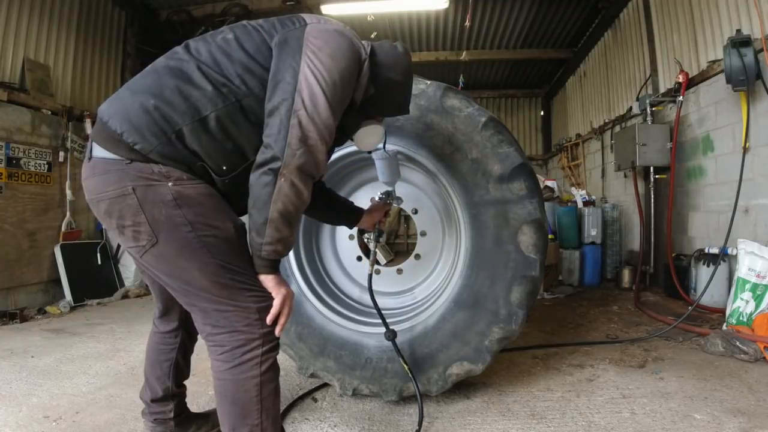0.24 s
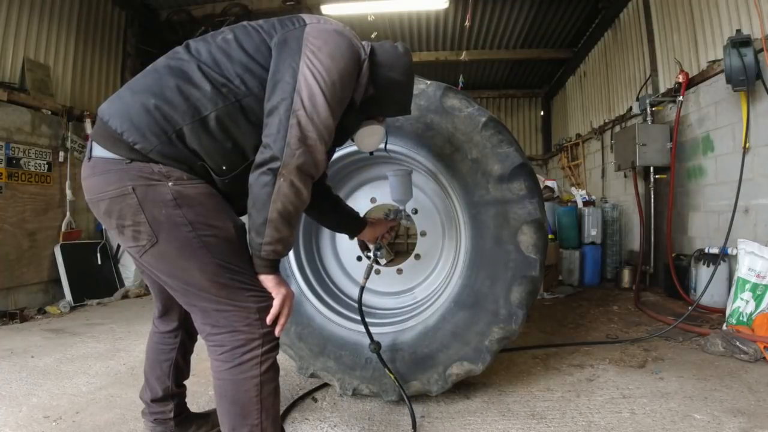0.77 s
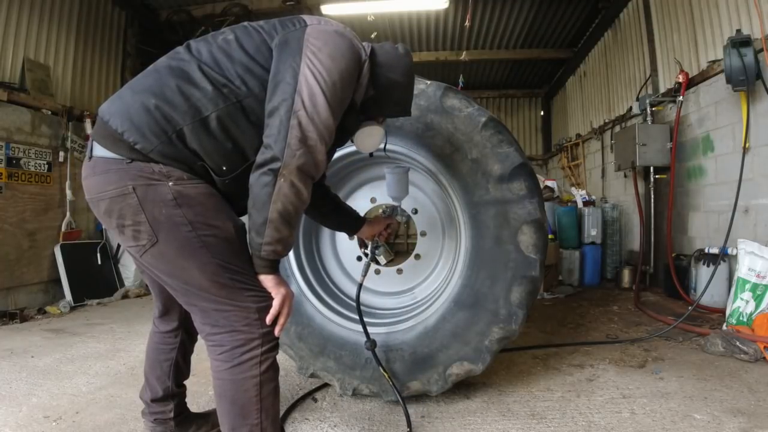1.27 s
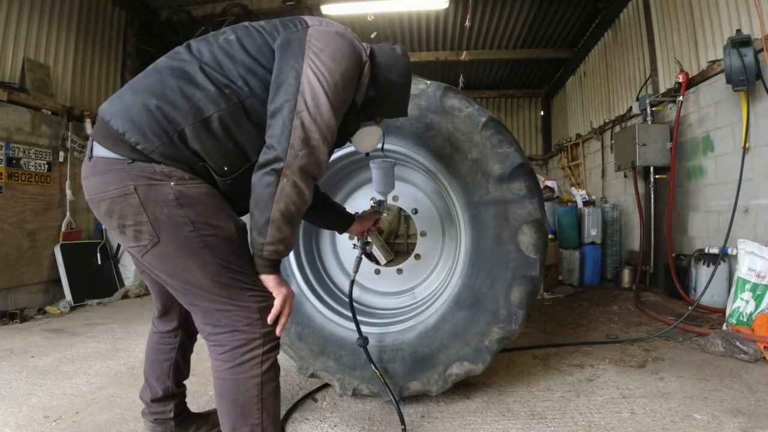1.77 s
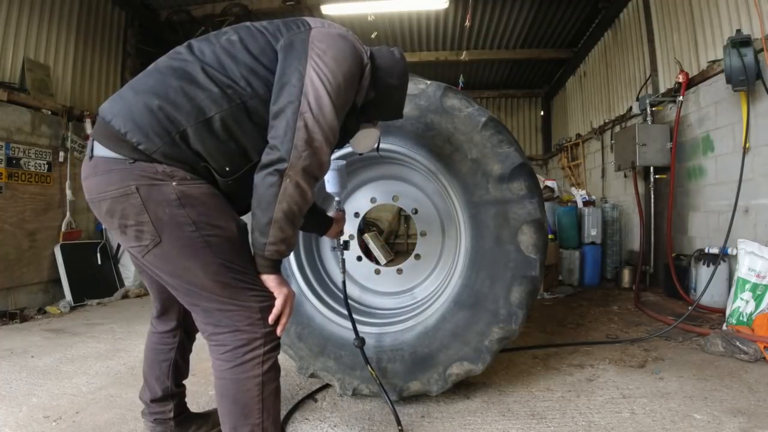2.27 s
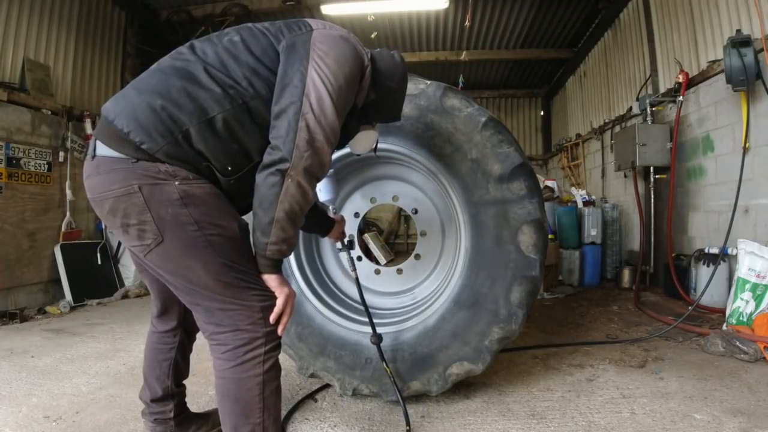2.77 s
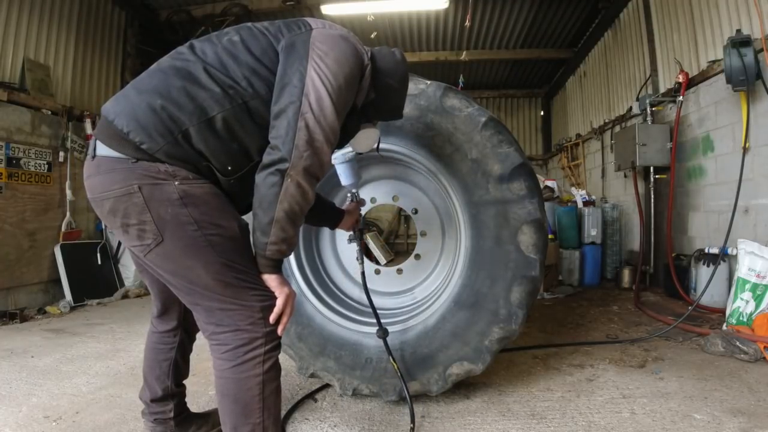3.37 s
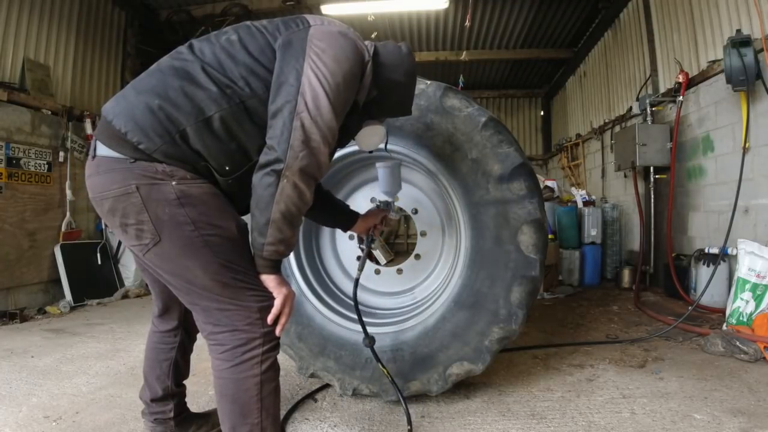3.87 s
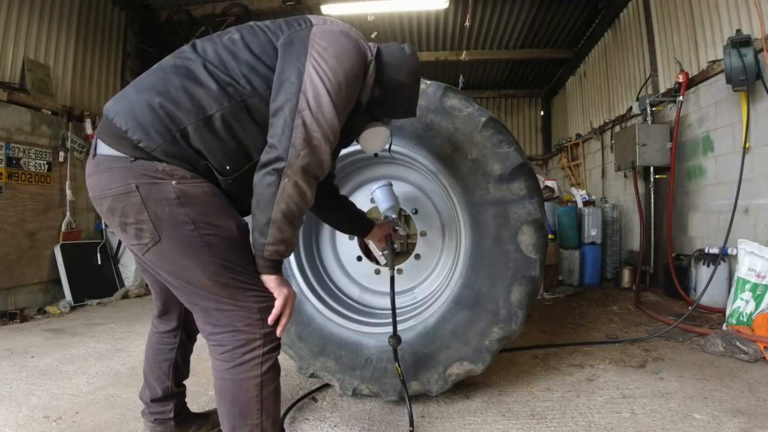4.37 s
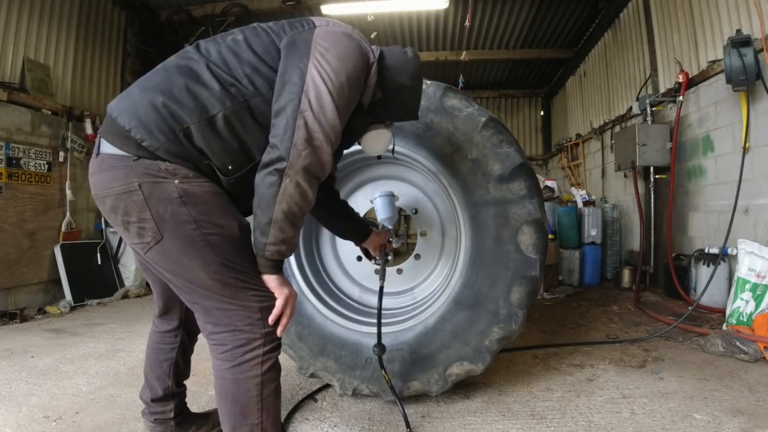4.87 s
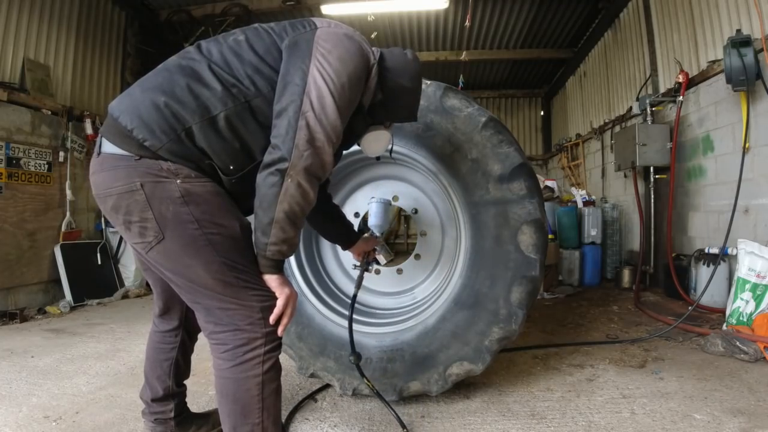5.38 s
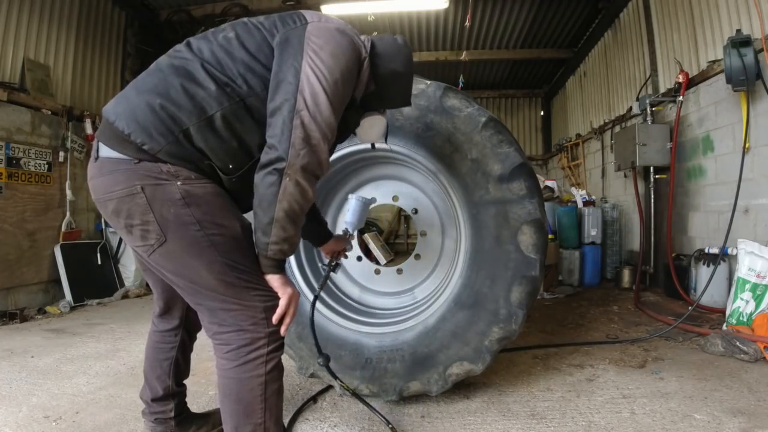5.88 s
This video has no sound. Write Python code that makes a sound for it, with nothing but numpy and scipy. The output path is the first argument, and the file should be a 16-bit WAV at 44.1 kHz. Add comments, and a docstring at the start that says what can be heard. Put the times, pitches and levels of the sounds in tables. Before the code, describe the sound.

A compressed-air spray gun paints a tractor wheel's steel rim, heard from nearby in a sheet-metal shed. Its loud, bright hiss is already going at the start and stops at about 0.6 seconds. Three longer passes follow, from 0.8 to 2.1 seconds, from 2.3 to 4 seconds, and from 4.3 to the end at about 6 seconds. Each opens with a brief, sharper rush of dry air. The hiss stays steady in level but shifts in colour as the gun moves, and thin whistling tones come and go inside it, very high at first and lower after about 2.3 seconds. Underneath, air flutters in the hollow of the rim with small low puffs, stronger from about 3 seconds, along with a faint draught. In the short breaks the shed's echo dies away quickly over a faint low hum.

```python
"""In a sheet-metal shed, a compressed-air gun sprays paint on a tractor wheel's steel rim, in four passes.
Each pull of the trigger lets out air first, then the full spray. The rushing jet hisses, changing colour
as it is turned, and brief tones ring in the gap between nozzle and steel. The air rings and flutters in
the dish of the rim and stirs up a draught. Between passes the shed's echo dies away over a low hum."""
import sys
import numpy as np
from scipy import signal
from scipy.io import wavfile

SR = 44100
rng = np.random.default_rng(int(sys.argv[2]) if len(sys.argv) > 2 else 0)


def to_wav(sig):
    """Store sig (one row per channel, or 1-D mono) as 16-bit WAV at the path in sys.argv[1].

    Samples outside -1..1 are clipped; the rate is SR.
    """
    pcm = np.clip(np.atleast_2d(sig), -1, 1) * 32767
    pcm = np.round(pcm).astype(np.int16)
    wavfile.write(sys.argv[1], SR, pcm.T)  # frames by channels


N = 270465

# trigger pulls: (air starts [s], full spray [s], let go [s], closing time [s],
# opening rush of dry air [dB], closing rush [dB])
TRIGGER_PULLS = [(-.2, -.1, 0.6, 0.057, 4.5, 3), (0.753, 0.793, 2.09, 0.051, 7, 1.5),
                 (2.292, 2.328, 3.966, 0.056, 4, 1), (4.231, 4.265, 6, 0.05, 6, 5)]
# colour of the hiss: (frequency [Hz], relative level [dB])
JET_SPECTRUM = [(250, -30.5), (450, -8.5), (850, -6.5), (1350, -6.5), (1800, -6), (2700, -5.5), (3700, 1),
                (5200, 0), (6800, -5), (8400, -3.5), (9600, -1.5), (12500, -4), (14500, -4), (16000, -7)]
# loudness of the hiss as the gun moves about the hub: (time [s], relative level [dB])
JET_LOUDNESS = [(.03, -32.5), (1.3, -32.5), (1.9, -32), (2.6, -34), (3.88, -31.5), (4.7, -31.5),
                (5.94, -30)]
# how alike the noise is at the two ears: (frequency [Hz], likeness [0 to 1])
EAR_LIKENESS = [(25, 0.97), (150, 1), (600, .96), (850, .97), (1350, 0.91), (1800, 1), (2200, 0.82),
                (3300, 0.88), (4300, 0.22), (5200, 0.51), (7000, 0.21), (8500, 0.15), (9700, 0.4),
                (11300, 0.24), (12800, 0.2), (15000, .12)]
# splash on the steel, in the middle treble: (time [s], relative level [dB])
SPLASH_SWING = [(.03, 4), (1.15, 5.5), (1.5, 9.5), (1.63, 8.5), (1.83, 9), (2, 6), (2.8, 4), (3.07, 4),
                (3.7, 7), (4.66, 7.5), (4.8, 3.5), (5.94, 3.5)]
# where the splash changes the hiss: (frequency [Hz], share of the swing [factor])
SPLASH_SHARE = [(2800, 0.11), (4000, 0.43), (5000, 1.1), (6300, 0.97), (8200, 0.89), (10000, 0.38),
                (12000, 0.44)]
# sizzle of the nozzle, in the top treble: (time [s], relative level [dB])
SIZZLE_SWING = [(0.03, 7), (0.57, 1.5), (1.06, 9), (1.42, 2), (1.96, -0.5), (2.62, 3), (4.77, 0.6),
                (5.94, 1.0)]
# where the sizzle changes the hiss: (frequency [Hz], share of the swing [factor])
SIZZLE_SHARE = [(7200, 0.034), (8500, .3), (9700, 0.69), (11000, 0.97), (12900, 0.93), (15500, 0.96)]
# air without paint is thinner and brighter: (frequency [Hz], share of the rush [factor])
DRY_AIR_SHARE = [(700, -1.64), (2000, 0.0027), (4500, -0.13), (7500, 0.95), (15000, 1)]
# whistles of the air cap at the gun's tip: (pitch [Hz], width [Hz], level over the hiss [dB])
CAP_WHISTLES = [(5260, 160, -16), (7400, 200, 3), (8650, 230, -12), (10030, 220, -5)]
# tones in the gap: (start [s], end [s], first pitch [Hz], last pitch [Hz], level over the hiss [dB])
GAP_RINGS = [(0, .6, 12900, 12700, 3), (0.152, 0.634, 9750, 9000, 4.5), (.418, 0.638, 10100, 10100, 3),
             (0.946, 1.35, 12700, 12850, 2), (1.652, 2.052, 5150, 5270, -5), (2.348, 2.603, 4030, 4100, 6),
             (2.61, 2.92, 4100, 4440, 4.5), (2.75, 3.197, 3480, 3400, 3), (3.3, 3.6, 3850, 3830, 1),
             (3.5, 3.98, 6000, 5450, -1), (4.318, 4.362, 4940, 4330, 6), (4.42, 5.05, 3850, 4020, 1.5),
             (4.475, 4.8, 5200, 5300, -5.5), (5.25, 5.9, 3800, 3600, -9), (5.794, 6.1, 10750, 10600, 1.5)]
# colour of the flutter: (frequency [Hz], relative level [dB])
FLUTTER_SPECTRUM = [(25, -30), (50, -20), (80, -0.5), (130, 3.5), (220, 0.5), (300, -4.5), (420, -14),
                    (800, -27.5)]
# the flutter grows as the jet is aimed into the dish: (time [s], relative level [dB])
FLUTTER_LOUDNESS = [(.03, -42), (.5, -43.5), (.88, -55), (1.3, -39.5), (1.83, -33), (2.0, -38),
                    (3.0, -39.5), (3.2, -32), (4.45, -31), (4.68, -34.5), (4.88, -31.5), (5.72, -29.5),
                    (6.0, -41)]
# the flutter gets brighter as the jet goes deeper: (time [s], tilt [dB per octave])
FLUTTER_BRIGHTNESS = [(.3, -5.5), (1.7, -1.5), (2.4, -1.2), (3.8, 1), (4.8, 1.4), (5.8, -0.2)]
# the jet catches a ledge of the rim and puffs: (time [s], boost to the flutter [dB])
LEDGE_PUFFS = [(1.51, -2), (2.095, 4), (2.335, 12), (2.365, 11), (3.27, 9), (3.935, 6), (4.277, -7),
               (4.46, 1), (4.855, 3), (4.97, 4.5), (5.43, 3), (5.69, 4.5)]
# notes of the rim's hollow: (pitch [Hz], width [Hz], level over the direct sound [dB])
RIM_NOTES = [(248.2, 5.7, 1.5), (395, 32, 0.5), (630, 48, -1.5), (1847, 225, -2.5), (2420, 160, -5)]
# how long the shed rings: (frequency [Hz], time to fade by 60 dB [s])
SHED_DECAY = [(100, 0.65), (600, 0.32), (2000, 0.23), (4500, 0.4), (9000, 0.35), (16000, 0.21)]
# how alike the echoes are at the two ears: (frequency [Hz], shared part [0 to 1])
ECHO_LIKENESS = [(100, 1), (800, 0.89), (2000, 0.4), (4000, 0.38)]
# colour of the draught: (frequency [Hz], relative level [dB])
DRAUGHT_SPECTRUM = [(25, 3), (55, 2), (110, -6), (220, -19.5), (450, -24), (900, -27)]
# swirls of air that reach the listener: (time [s], half length [s], boost to the draught [dB])
SWIRLS = [(.9, 0.2, 13), (1.965, 0.17, 11), (3.5, .15, 7)]
# colour of the background hum: (frequency [Hz], relative level [dB])
HUM_SPECTRUM = [(25, 0), (60, 5), (130, -24), (270, -13), (600, -9), (1000, -12), (1800, -24), (5000, -27),
                (15000, -50)]


def from_db(db):
    """Turn decibels into a number to multiply by."""
    return 10 ** (np.asarray(db) / 20)


def at_hz(table, hz):
    """Read a table at one frequency, with octaves evenly spaced."""
    table = np.array(table)
    return np.interp(np.log(hz), np.log(table[:, 0]), table[:, 1])


def in_time(table):
    """Read a (time, value) table at every sample."""
    return np.interp(np.arange(N) / SR, *np.transpose(table))


def drift(rate):
    """A smooth random wobble of typical size 1 that changes about rate times a second."""
    r = np.exp(-80 * np.pi * rate / SR)
    slow = signal.lfilter([1], [1, -2 * r, r * r], rng.standard_normal(N // 40 + 2002))[2000:]
    return np.interp(np.arange(N) / 40, np.arange(len(slow)), slow / np.sqrt(np.mean(slow ** 2)))


def filtered(x, hz, kind):
    """Keep a band of frequencies ("band") or those above hz ("high")."""
    return signal.sosfilt(signal.butter(2, hz, kind, fs=SR, output="sos"), x)


def noise_bands(spectrum, edges, likeness=EAR_LIKENESS):
    """Stereo noise as (centre [Hz], band) pairs; together the bands have strength 1."""
    white = rng.standard_normal((2, 2, N))
    centres, bands = np.sqrt(edges[1:] * edges[:-1]), []
    for k, hz in enumerate(centres):
        mid, side = filtered(white[k % 2], edges[k:k + 2], "band")
        alike, gain = at_hz(likeness, hz), from_db(at_hz(spectrum, hz))
        mid, side = np.sqrt(1 + alike) * mid, np.sqrt(1 - alike) * side
        bands.append(gain * np.array([mid + side, mid - side]))
    total = np.std(sum(bands))
    return [(hz, band / total) for hz, band in zip(centres, bands)]


def resonance(x, hz, width):
    """The part of a sound that rings near one pitch."""
    r = np.exp(-np.pi * width / SR)
    feedback = [1, -2 * r * np.cos(2 * np.pi * hz / SR), r * r]
    return signal.lfilter(np.array([1, 0, -1]) * (1 - r * r) / 2, feedback, x)


def delayed(x, delay_s):
    """The same stereo sound, arriving later."""
    n = np.arange(N)
    return np.array([np.interp(n - delay_s * SR, n, side) for side in x])


def valve(opening_s, first_air_db, late_s):
    """Flow from 0 to 1: a little air first, then the needle lifts, and it shuts on release."""
    t, flow = np.arange(N) / SR - late_s, 0
    for air, full, let_go, closing_s, _, _ in TRIGGER_PULLS:
        first_air = from_db(first_air_db) * np.clip((t - air) / opening_s, 0, 1)
        spray = np.clip(1 + (t - full) / opening_s, 0, 1) ** 2
        closing = np.exp(-2 * np.maximum(t - let_go, 0) / closing_s)
        flow += np.maximum(first_air, spray) * closing
    return flow


def dry_air_rush(settle_s):
    """Dry air rushes out before the paint flows and again as the needle shuts; in dB."""
    t, out = np.arange(N) / SR, 0
    for air, full, let_go, _, opening_db, closing_db in TRIGGER_PULLS:
        out += opening_db * np.exp(-np.maximum(t - full, 0) / settle_s) * (t > air)
        out += closing_db * np.exp(-np.abs(t - let_go) / settle_s)
    return out


def jet(patchy_db, sputter_db):
    """Churning air hisses, coloured by splash and sizzle; the paint leaves a little unevenly."""
    edges = np.r_[np.geomspace(250, 4000, 11), np.geomspace(4700, 17000, 11)]
    splash_db, sizzle_db = in_time(SPLASH_SWING), in_time(SIZZLE_SWING)
    rush_db, out = dry_air_rush(settle_s=0.055), 0
    for hz, band in noise_bands(JET_SPECTRUM, edges):
        colour_db = at_hz(SPLASH_SHARE, hz) * (splash_db - splash_db.mean())
        colour_db += at_hz(SIZZLE_SHARE, hz) * (sizzle_db - sizzle_db.mean())
        colour_db += at_hz(DRY_AIR_SHARE, hz) * rush_db
        out += band * from_db(colour_db + patchy_db * drift(16.2))
    return out * from_db(in_time(JET_LOUDNESS) + sputter_db * drift(73))


def air_cap(x, fade_s):
    """Holes in the air cap whistle at each pull until paint wets them."""
    t = np.arange(N) / SR
    dryness = sum((t > air) * np.exp(-np.maximum(t - full, 0) / fade_s)
                  for air, full, *_ in TRIGGER_PULLS)
    return x + dryness * sum(from_db(db) * resonance(x, hz, width) for hz, width, db in CAP_WHISTLES)


def nozzle_gap(x, sharpness):
    """The gap between nozzle and steel rings for a moment; its pitch slides with the hand."""
    t, out = np.arange(N) / SR, x.copy()
    for start, end, first_hz, last_hz, db in GAP_RINGS:
        now = (t > start) & (t < end)
        progress = (t[now] - start) / (end - start)
        pitch_hz = first_hz + (last_hz - first_hz) * progress
        # shift the sliding pitch down to 0 Hz, smooth away the rest, shift it back
        spin = np.exp(2j * np.pi * np.cumsum(pitch_hz) / SR)
        r = np.exp(-np.pi * first_hz / sharpness / SR)
        ring = signal.lfilter([1 - r], [1, -r], x[:, now] / spin) * spin
        out[:, now] += 2 * ring.real * from_db(db) * np.sqrt(np.sin(np.pi * progress))
    return out


def flutter(lumpy_db, puff_s):
    """Air piling up in the dish of the rim rumbles in low lumps."""
    t, tilt_db = np.arange(N) / SR, in_time(FLUTTER_BRIGHTNESS)
    puff_db = sum(db * np.exp(-((t - when) / puff_s) ** 2) for when, db in LEDGE_PUFFS)
    bands = noise_bands(FLUTTER_SPECTRUM, np.geomspace(22, 900, 12))
    rumble = sum(band * from_db(tilt_db * np.log2(hz / 140)) for hz, band in bands)
    return rumble * from_db(in_time(FLUTTER_LOUDNESS) + puff_db + lumpy_db * drift(12))


def wheel_rim(x, echo_db, path_s, sway_s, sway_hz, echoes=5):
    """The rim rings and throws back quick echoes, whose delays slide as the hand moves."""
    out = x + sum(from_db(db) * resonance(x, hz, width) for hz, width, db in RIM_NOTES)
    treble = filtered(out, 2200, "high")
    for k in range(echoes):
        delay_s = path_s * (k + rng.uniform(0.486, 1.5)) + sway_s * drift(sway_hz)
        out += from_db(echo_db) * delayed(treble, delay_s)
    return out


def floor_bounce(x, delay_s, echo_db, dull_hz):
    """A dull echo off the concrete floor weakens evenly spaced low frequencies."""
    dull = signal.sosfiltfilt(signal.butter(1, dull_hz, fs=SR, output="sos"), x)
    return x + from_db(echo_db) * delayed(dull, delay_s)


def shed_echo(x, build_s, move_hz, paths=3):
    """Dense echoes fade band by band; the moving gun feeds an ever-changing mix of paths."""
    t, edges, out = np.arange(SR * 3 // 4) / SR, np.geomspace(40, 17000, 10), 0
    feeds = np.array([drift(move_hz) for _ in range(paths)])
    for feed in feeds / np.sqrt(np.sum(feeds ** 2, axis=0)):
        tail = 0
        for k, hz in enumerate(np.sqrt(edges[1:] * edges[:-1])):
            mid, side = filtered(rng.standard_normal((2, len(t))), edges[k:k + 2], "band")
            alike, decay_s = at_hz(ECHO_LIKENESS, hz), at_hz(SHED_DECAY, hz)
            stereo = np.sqrt(alike) * mid + np.sqrt(1 - alike) * np.array([side, -side])
            same_energy = np.sqrt(2 * np.log(1000) / (decay_s * SR))  # longer rings start softer
            tail += stereo * from_db(-60 * t / decay_s) * same_energy
        tail *= np.clip(t / build_s, 0, 1)
        out += signal.fftconvolve(x.mean(axis=0)[None] * feed, tail, axes=1)[:, :N]
    return out


def draught(level_db, lag_s, gusty_db):
    """Air stirred by the jet lags behind the trigger and brushes each ear separately."""
    t, r = np.arange(N) / SR, np.exp(-1 / (lag_s * SR))
    stirred = signal.lfilter([1 - r], [1, -r], valve(opening_s=0.02, first_air_db=-30, late_s=0))
    swirl_db = sum(db * np.exp(-((t - when) / half_s) ** 2) for when, half_s, db in SWIRLS)
    bands = noise_bands(DRAUGHT_SPECTRUM, np.geomspace(18, 900, 7), likeness=[(1, 0)])
    gust_db = gusty_db * np.array([drift(31), drift(15)])
    return sum(band for _, band in bands) * stirred * from_db(level_db + swirl_db + gust_db)


def yard_hum(level_db):
    """The dull, steady background noise of the yard."""
    bands = noise_bands(HUM_SPECTRUM, np.geomspace(22, 16000, 12))
    return from_db(level_db) * sum(band for _, band in bands)


def scene():
    """Hiss and flutter follow the trigger, then bounce off the rim, the floor and the shed."""
    hiss = jet(patchy_db=1.61, sputter_db=0.53)
    hiss *= valve(opening_s=0.021, first_air_db=-29, late_s=0.0015)
    hiss = from_db(6) * nozzle_gap(air_cap(hiss, fade_s=0.05), sharpness=25)
    rumble = from_db(-1.5) * flutter(lumpy_db=1.7, puff_s=0.019)
    rumble *= valve(opening_s=0.0079, first_air_db=-36, late_s=0.0054)
    gun = wheel_rim(hiss + rumble, echo_db=-14, path_s=0.0011, sway_s=0.0002435, sway_hz=1.245)
    gun = floor_bounce(gun, delay_s=0.001817, echo_db=-17, dull_hz=1890)
    heard = gun + from_db(-7.5) * shed_echo(gun, build_s=0.011, move_hz=2.5)
    # the listener stands where the shed's echoes partly cancel one low note
    heard -= from_db(-6) * resonance(heard, hz=287, width=62)
    return heard + draught(level_db=-55, lag_s=0.11, gusty_db=3.5) + yard_hum(level_db=-57)


def record(dry):
    """Cut the treble steeply above 15900 Hz."""
    return signal.sosfilt(signal.ellip(12, 0.1, 80, 15900, fs=SR, output="sos"), dry)


dry = scene()
out = record(dry)
to_wav(out)
```